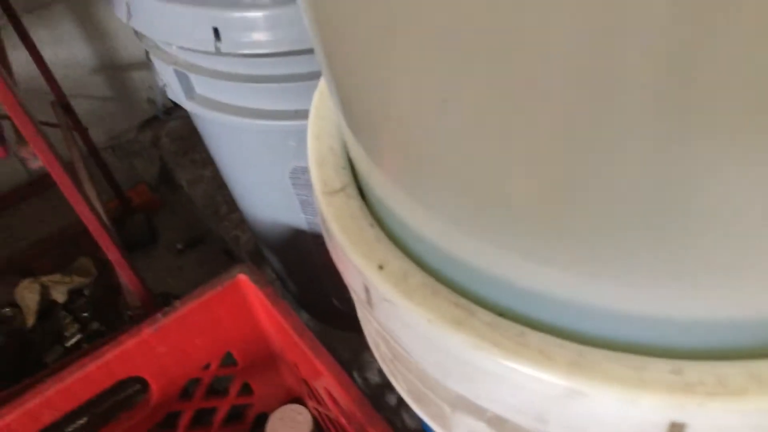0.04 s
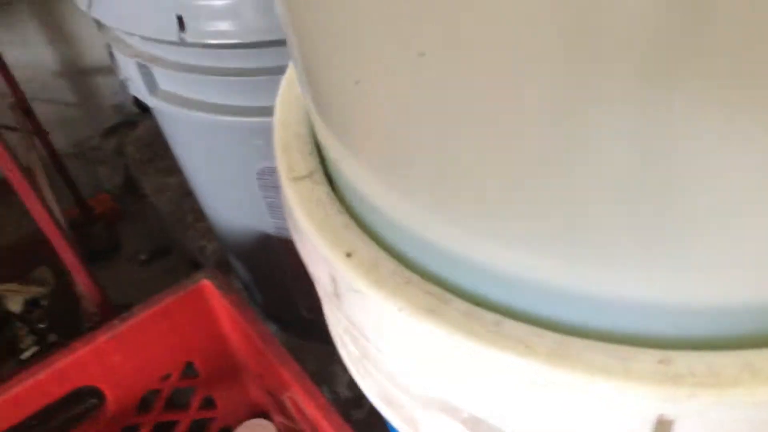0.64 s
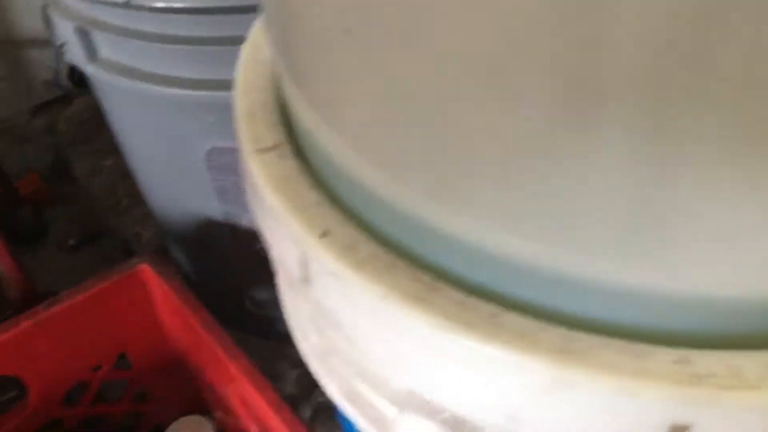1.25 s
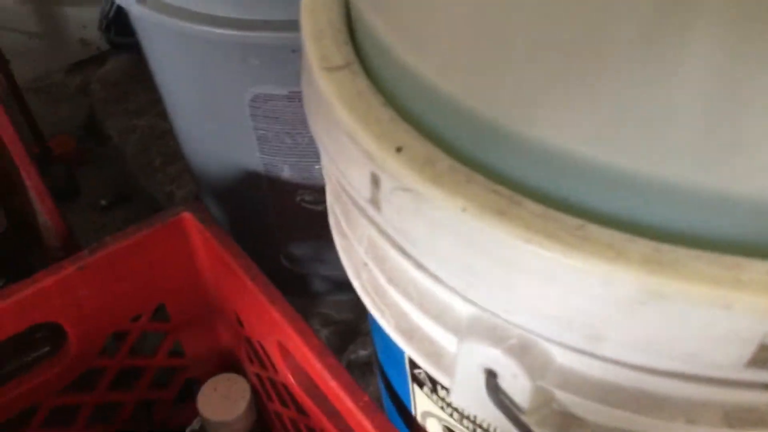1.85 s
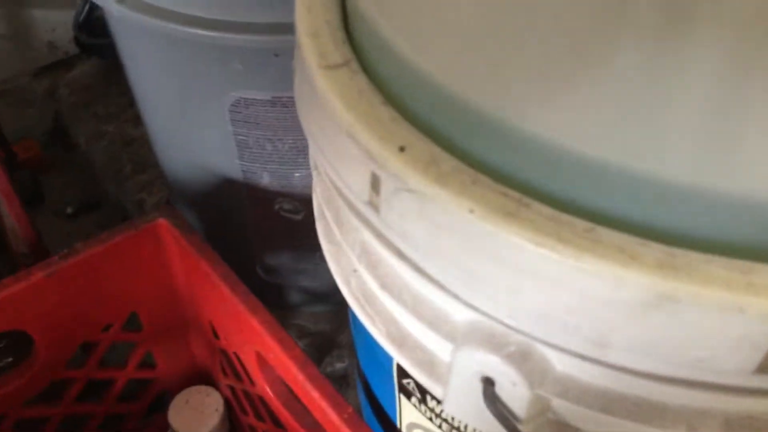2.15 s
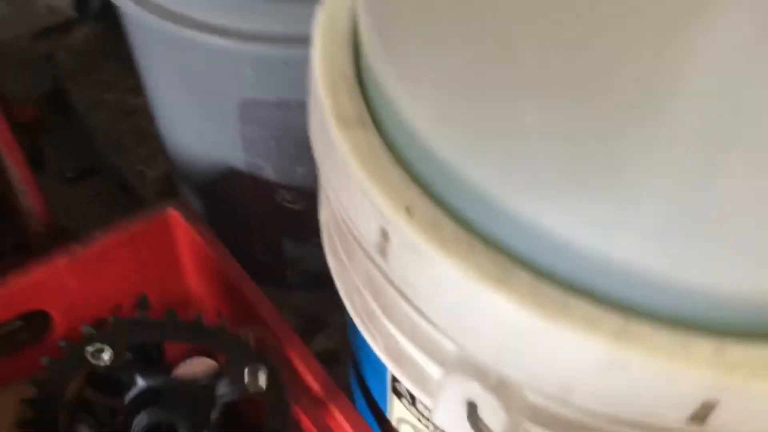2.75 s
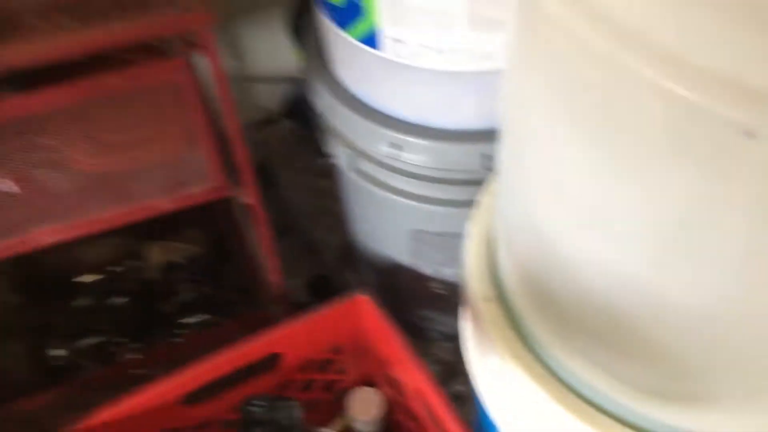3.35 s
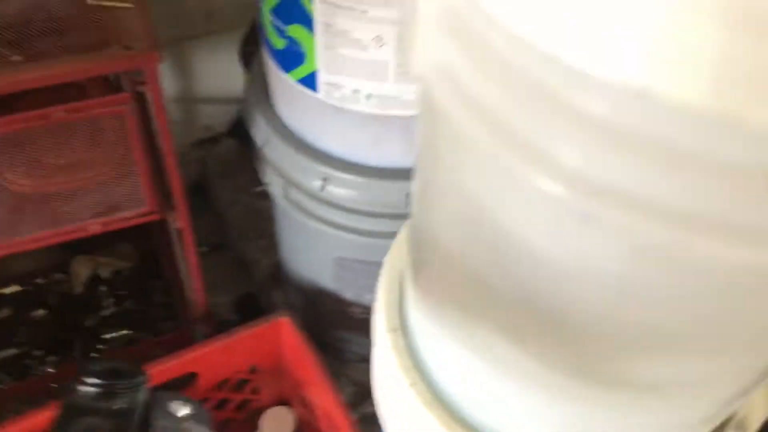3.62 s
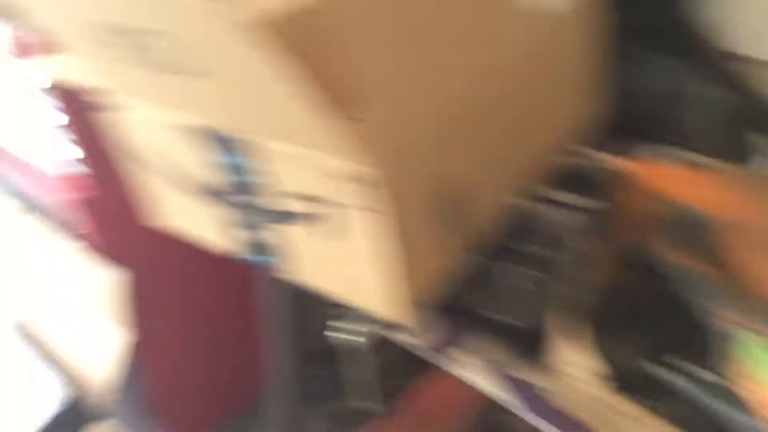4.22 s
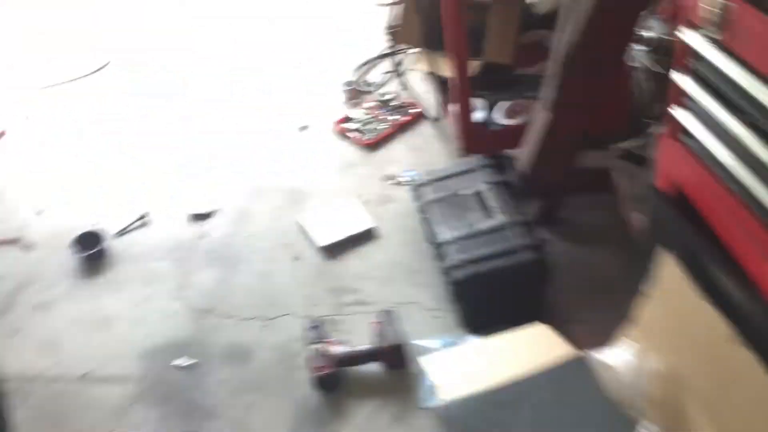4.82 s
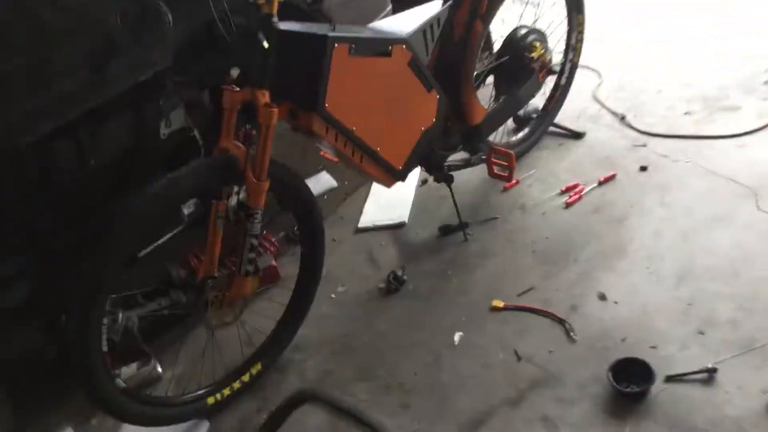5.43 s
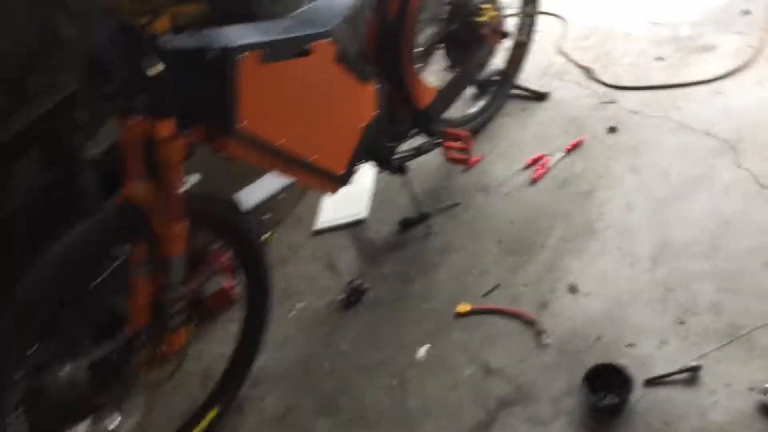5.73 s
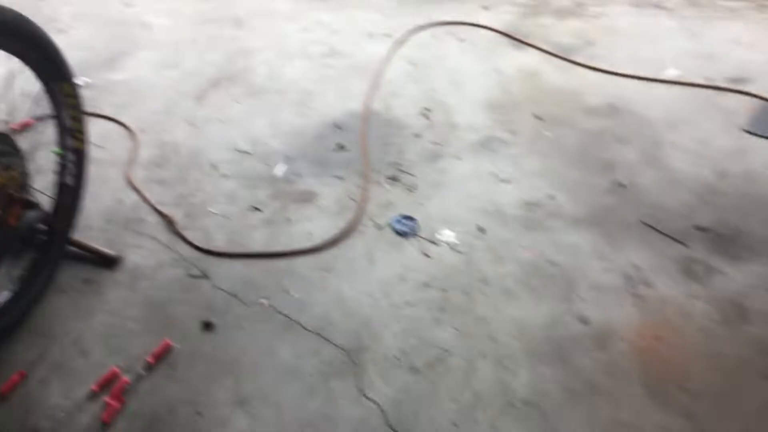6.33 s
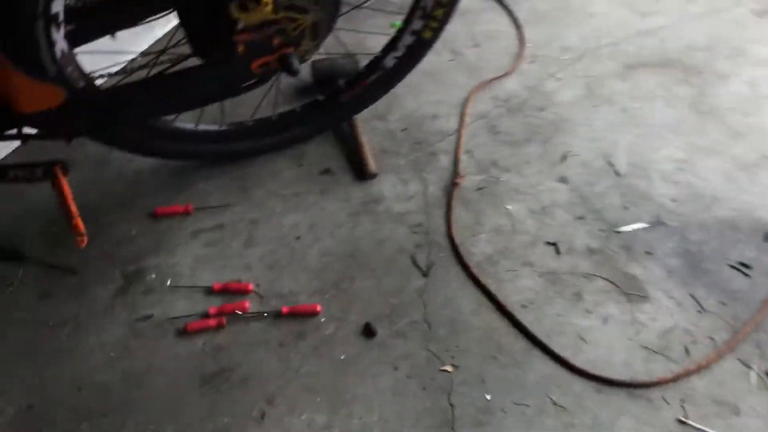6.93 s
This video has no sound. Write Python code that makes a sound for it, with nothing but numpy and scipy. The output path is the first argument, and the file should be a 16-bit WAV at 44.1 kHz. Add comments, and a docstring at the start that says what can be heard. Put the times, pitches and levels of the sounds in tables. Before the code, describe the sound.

A bicycle crankset is worked out of a plastic crate, close by in a garage with a short echo. Light scrapes and small knocks begin at once. From about 1 second the knocks get louder and come in uneven clusters, with a hollow boom from the crate near 1.4 seconds. The metal chainring clinks and rings brightly over the grating, loudest around 1.9, 2.3 and 2.6 seconds. The crankset comes free at about 3 seconds and the scraping dies away. From 4 seconds it is carried across the floor with faint jingles, swishing clothes and a few soft foot thumps. One sharp, ringing metal clank stands out at 5.2 seconds, followed by light ticks and rustles until about 7 seconds. A low traffic rumble runs underneath throughout, and distant engines rise slightly in pitch as they pull away between 3 and 6 seconds.

```python
"""A bicycle crankset (the pedal arms and their toothed chainring) is worked out of a plastic crate.
Parts scrape and knock, the hollow crate booms and the metal chainring clinks, echoing in a garage.
The crankset is then carried across the floor, jingling faintly and giving one sharp clank, while
feet thump and clothes rub with each stride. Outside, distant engines rise in pitch as they pull
away over a low traffic rumble."""
import sys
import numpy as np
from scipy import signal
from scipy.fft import rfft, irfft, next_fast_len
from scipy.io import wavfile
from scipy.ndimage import uniform_filter1d

SR = 44100
rng = np.random.default_rng(int(sys.argv[2]) if len(sys.argv) > 2 else 0)


def log_audio(samples):
    """Write samples as a 16-bit WAV file to the path given in sys.argv[1]."""
    # one column per channel
    frames = np.atleast_2d(samples).T
    # limit to full scale, then quantise
    limited = np.clip(frames, -1, 1)
    pcm = np.round(limited * 32767).astype(np.int16)
    wavfile.write(sys.argv[1], SR, pcm)


N = 311787
T = np.arange(N) / SR
HIT_T = T[:16384]  # time within one hit, in seconds
LIFT_OUT_S = 3.005  # when the crankset leaves the crate
# the chainring's natural tones (modes): pitch_hz, level_db, t60_s (time to fade by 60 dB)
CHAINRING_MODES = [(1141, -34, 0.049), (1254, -14.5, 0.24), (1528, -21, .18), (1914, -12.5, 0.079),
                   (2125, -18.5, 0.11), (2767, -15, 0.17), (3020, -9, 0.23), (3658, -3, 0.48),
                   (3790, -1.5, .26), (4134, -4.5, 0.71), (4565, -9, 0.14), (5500, -13.5, 0.22),
                   (6040, -13, 0.35), (7000, -24, 0.27), (7180, -16.5, 0.19), (7220, -8.5, 0.42),
                   (8090, -6, 0.29), (8990, -10, 0.79), (9290, -23.5, 0.39), (11600, -22, .25),
                   (11800, -19, 0.66), (13730, -26, 0.13)]


def undb(db):
    """Turn decibels into a gain."""
    return 10 ** (np.asarray(db) / 20)


def unit(x):
    """Scale to an average (rms) level of 1."""
    return x / np.sqrt(np.mean(x ** 2) + 1e-20)


def crest(x):
    """The level of the loudest three milliseconds."""
    return np.sqrt(uniform_filter1d(x ** 2, 132).max() + 1e-20)


def fade(t60):
    """A fade that falls 60 dB every t60 seconds."""
    return np.exp(-np.log(1000) * HIT_T / np.maximum(t60, 1e-3))


def curves(table):
    """Join a table's timed points into one curve per value column."""
    times, *columns = np.transpose(table)
    return [np.interp(T, times, column) for column in columns]


def band(x, low_hz, high_hz, order=3):
    """Keep the sound between two frequencies."""
    sos = signal.butter(order, [low_hz, min(high_hz, SR / 2 - 1000)], "band", fs=SR, output="sos")
    return signal.sosfilt(sos, x + 1e-18)


def colour(x, points):
    """Shape a sound's bass and treble by (pitch_hz, level_db) points."""
    hz, db = np.transpose(points)
    size = next_fast_len(len(x))
    bin_hz = np.maximum(np.fft.rfftfreq(size, 1 / SR), 1)
    gain = undb(np.interp(np.log(bin_hz), np.log(hz), db))
    return irfft(rfft(x, size) * gain, size)[:len(x)]


def wander(rate_hz):
    """A slow random drift of about 1 either way."""
    hold = int(SR / rate_hz)
    steps = np.repeat(rng.standard_normal(N // hold + 1), hold)
    return unit(uniform_filter1d(steps, hold)[:N])


def add(out, start_s, sound):
    """Mix a sound in at a given time."""
    i = max(int(start_s * SR), 0)
    out[i:i + len(sound)] += sound[:N - i]


def stroke(start_s, length_s, swell_s, release_t60):
    """The loudness of one rubbing movement: it swells, holds and dies away."""
    swell = np.clip((T - start_s) / swell_s, 0, 1)
    return swell * np.exp(-np.log(1000) * np.clip((T - start_s - length_s) / release_t60, 0, 2))


def friction(per_s, spread_db, t60):
    """Rubbing surfaces make tiny catches of uneven size, each a short burst of noise."""
    catches = (rng.random(N) < per_s / SR) * undb(spread_db * np.minimum(rng.exponential(size=N), 4))
    energy = signal.fftconvolve(catches ** 2, fade(t60) ** 2)[:N]
    return unit(rng.standard_normal(N) * np.sqrt(np.abs(energy)))


def scraping(sing_db=-5, crate_db=-27, crate_follow=0.47):
    """Parts grate, set the chainring singing and drum on the crate until the crankset is lifted."""
    # shoves that drag the parts over each other: start_s, length_s, level_db
    shoves = [(0.032, 0.16, -43.5), (0.372, 0.037, -51), (.48, 0.039, -54.5), (0.647, 0.021, -44),
              (0.709, 0.052, -47), (0.998, .22, -46), (1.217, 0.096, -44), (1.376, 0.037, -43),
              (1.686, 0.087, -43), (1.859, 0.18, -41), (2.092, 0.049, -45.5), (2.204, 0.036, -36),
              (2.336, 0.22, -39), (2.494, .16, -38), (2.714, 0.23, -42), (2.97, 0.034, -62),
              (3.17, 0.11, -48)]
    # light rubbing between shoves: time_s, level_db
    rubbing = [(0, -54.5), (.9, -62.5), (1.6, -55.5), (3.1, -46.5), (3.4, -63), (3.7, -71)]
    # tone of the scrape: pitch_hz, level_db
    scrape_colour = [(700, 11.5), (1300, 4.5), (1800, 4.5), (2600, -3), (4200, -2), (8000, -9),
                     (11000, -10.5), (16000, -17.5)]
    # its treble compared with its middle range: time_s, level_db
    treble = [(.3, -4), (1.1, -7), (2.7, -7), (3.0, -1.5), (3.25, 4), (3.4, 3)]
    # the hollow crate's tones: pitch_hz, width_hz, level_db
    crate_modes = [(196, 30, -3), (313, 66, -0.5), (573.3, 71, -1.5), (684, 59, -2)]
    rubbing_db, treble_db = curves(rubbing) + curves(treble)
    pushes = [undb(db) * stroke(start_s, length_s, swell_s=0.033, release_t60=0.11)
              for start_s, length_s, db in shoves]
    level_db = 20 * np.log10(np.hypot(np.max(pushes, axis=0), undb(rubbing_db)))
    grit = friction(per_s=1100, spread_db=4.5, t60=0.018)
    grate = colour(grit, scrape_colour)
    grate = unit(band(grate, 1200, 5500)) + undb(treble_db) * unit(band(grate, 5500, 17000))
    # scraping teeth feed all the modes about equally
    ring = sum(np.sin(2 * np.pi * hz * HIT_T) * fade(t60) for hz, _, t60 in CHAINRING_MODES)
    grate += undb(sing_db) * unit(signal.fftconvolve(grate, ring)[:N])
    grate *= np.clip((rubbing[-1][0] - T) * 20, 0, 1)  # stops when the rubbing ends
    hollow = unit(sum(undb(db) * band(grit, hz - width / 2, hz + width / 2, order=2)
                      for hz, width, db in crate_modes))
    hollow *= np.clip((LIFT_OUT_S - T) * 10, 0, 1)
    return grate * undb(level_db) + hollow * undb(crate_follow * level_db + crate_db)


def street(gain_db=-1, overtone_db=-22, recede_db_per_s=2, air_db=-63.5):
    """Traffic rumbles and air hisses softly; engines rise in pitch and fade as they drive off."""
    # traffic rumble: time_s, low_band_db, upper_band_db
    rumble = [(0, -45.5, -64), (2.9, -43.5, -58), (3.45, -37, -52.5), (4.0, -45, -53.5), (4.5, -50, -50),
              (7.07, -49.5, -52)]
    # engines pulling away: start_s, end_s, start_pitch_hz, end_pitch_hz, level_db
    engines = [(3.112, 3.942, 112.6, 130.5, -39), (4.2, 4.848, 206, 227, -54),
               (4.695, 6.101, 77.9, 83.4, -47.5)]
    # tone of the still air: pitch_hz, level_db
    air_colour = [(150, -11.5), (290, -2), (450, -9.5), (900, -14.5), (1300, -18), (4200, -21.5),
                  (7000, -30), (13300, -27.5), (16000, -33.5)]
    low_db, upper_db = curves(rumble)
    out = undb(low_db + gain_db) * unit(band(rng.standard_normal(N), 50, 108.3))
    out += undb(upper_db + gain_db) * unit(band(rng.standard_normal(N), 93, 240))
    for start_s, end_s, start_hz, end_hz, db in engines:
        hz = np.interp(T, [start_s, end_s], [start_hz, end_hz]) * (1 + .006 * wander(11))
        phase = 2 * np.pi * np.cumsum(hz) / SR
        hum = unit(np.sin(phase) + undb(overtone_db) * np.sin(2 * phase))
        throttle = np.clip(np.minimum(T - start_s, end_s - T) * 20, 0, 1)
        level_db = db + gain_db - recede_db_per_s * (T - start_s) + 3.4 * wander(11)
        out += throttle * undb(level_db) * hum
    air_gain = undb(air_db + 2.2 * wander(5.4))
    air = band(colour(rng.standard_normal(N), air_colour), 60, 20000, order=2)
    return out + air_gain * unit(air)


def small_part(t60, count=90):
    """A piece of metal or plastic rings briefly with many tones, the high ones dying first."""
    hz = 150 + 15500 * rng.random((count, 1)) ** 1.5
    strength = rng.standard_normal((count, 1))
    mode_t60 = t60 * rng.uniform(0.61, 1.0, (count, 1)) * (3000 / hz) ** 0.39
    modes = strength * np.sin(2 * np.pi * hz * HIT_T) * fade(mode_t60)
    return unit(modes.sum(axis=0)[:2048])


def knocks(onset_db=-21, chatter_db=-6, ring_db=-2, gain_db=-1, lift_s=.18, lifted_boom_db=-26.5):
    """Each knock has a brief soft onset, a main hit and a quick chatter, ringing the struck part."""
    # parts knocking together: start_s, level_db, brightness_db_per_octave, chatter_s
    hits = [(0.067, -28.5, 1, 0.0045), (0.105, -34.5, 5, .003), (.193, -31.5, 3.5, 0.0053),
            (0.228, -32.5, 5, 0.0032), (.279, -39, -2, 0.003), (0.486, -43, -5.5, 0.0069),
            (0.598, -39, 7.5, 0.012), (0.721, -37.5, 3.5, 0.008), (0.865, -45.5, -3.5, 0.0057),
            (1.063, -18, 1, 0.0087), (1.088, -21, -1, .003), (1.114, -17.5, -.5, 0.0084),
            (1.142, -25, -2.5, 0.02), (1.276, -28.5, -1.5, .002), (1.372, -17.5, 0, 0.0037),
            (1.409, -34, -5.5, 0.012), (1.523, -25.5, 1, 0.0028), (1.563, -39, 0, 0.0014),
            (1.601, -24, 0, 0.0093), (1.622, -25.5, -2, .018), (1.892, -27.5, -1, 0.043),
            (1.916, -23.5, 3, 0.018), (1.941, -23, 0, 0.014), (1.98, -32, 1, 0.017),
            (2.118, -24, -1, 0.0025), (2.293, -30, -2, 0.027), (2.323, -22, 1, 0.0066),
            (2.378, -26, 0.5, 0.0026), (2.445, -31.5, -0.5, 0.0068), (2.562, -18, 1.5, 0.0044),
            (2.711, -25, -0.5, 0.015), (2.782, -19.5, -0.5, 0.0065), (2.846, -27.5, 0, 0.0081),
            (2.866, -28.5, 3.5, 0.0086), (2.884, -21.5, 1, .0065), (2.957, -24.5, 0, 0.0033),
            (2.978, -29, 1.5, .009), (3.084, -36.5, -1, 0.0047), (3.108, -30, 3.5, 0.0016),
            (3.169, -29, -1.5, 0.0062), (3.312, -37.5, -2, 0.0076), (5.183, -26, 2, 0.0044)]
    # tone shared by all knocks: low_hz, high_hz, level_db
    bands = [(124, 324, -17), (568, 1094, -9.5), (1284, 2875, -2), (2850, 6000, 0), (6000, 16000, -4.5)]
    out = np.zeros(N)
    lead = SR // 125  # samples of soft onset before the hit
    t = HIT_T[:4096] - lead / SR
    for start_s, db, tilt_db, chatter_s in hits:
        force = np.where(t < 0, undb(onset_db) * np.exp(t / 0.014), np.exp(-np.abs(t) / chatter_s))
        clicks = undb(chatter_db) * rng.standard_normal(len(t)) * (rng.random(len(t)) < .15) * force
        clicks[lead] = 1
        crack = unit((rng.standard_normal(len(HIT_T)) * fade(0.026))[:2048])
        hit = signal.fftconvolve(clicks, crack + undb(ring_db) * small_part(t60=.032))
        # the two lowest bands are the crate's floor, which booms less as the crankset is lifted
        boom_db = lifted_boom_db * np.clip(1 + (start_s - LIFT_OUT_S) / lift_s, 0, 1)
        for k, (low_hz, high_hz, band_db) in enumerate(bands):
            part = band(hit, low_hz, high_hz)
            octaves = np.log2(np.sqrt(low_hz * high_hz) / 4100)
            level_db = db + gain_db + band_db + tilt_db * octaves + boom_db * (k < 2)
            add(out, start_s - lead / SR, undb(level_db) * part / crest(part))
    return out


def clinks(contact_t60=.05, sing_db=-16, tooth_t60=0.36, twin_db=-6, split_hz=35,
           bounce_s=0.01, bounce_db=-12, loose_below_db=-34, clatter_db=-4):
    """The struck chainring rings hard, then sings on; light touches leave it loose, so it jangles."""
    # blows on the chainring: start_s, level_db, tooth_pitch_hz, tooth_boost_db, ring_length_share
    blows = [(.600, -43.5, 7900, -6, .38), (.672, -37, 1283, 10, 0.091), (.935, -51.5, 4180, 2, 0.67),
             (1.134, -24.5, 6780, 7, .45), (1.613, -24, 1594, -8, 0.81), (1.643, -33.5, 7230, 1, 0.59),
             (1.727, -35.5, 7230, 20, 0.9), (1.76, -36.5, 7260, 8, 0.66), (1.895, -22, 7260, 5, 0.61),
             (1.921, -12.5, 3014, -0.5, 0.17), (2.217, -36.5, 8000, -7, .4), (2.297, -29.5, 11750, -16, .8),
             (2.326, -17, 3596, 8, 1), (2.329, -31, 12841, 8, .6), (2.335, -23, 1121, 13, 0.4),
             (2.563, -11.5, 4155, 2.5, .29), (2.621, -26, 4170, 11, 0.78), (2.712, -19, 4143, 6, 0.3),
             (2.867, -21, 2720, 8, 0.15), (2.886, -32, 10200, 10, .7), (3.090, -31, 4630, 4, 0.55),
             (3.138, -25, 3840, 11, .05), (3.794, -55.5, 2973, -2, 0.26), (4.075, -50, 2256, 7, .2),
             (4.236, -58.5, 7280, 12, 0.48), (4.281, -49.5, 2180, 3.5, 1), (4.334, -52.5, 2940, 2, 0.63),
             (4.68, -58, 2250, -2, .3), (5.085, -55, 3700, 11, .3), (5.172, -34, 3800, -12, .3),
             (5.184, -17, 2708, -0.5, .45), (5.1907, -11.5, 3700, -2.5, 0.21),
             (5.480, -46.5, 3675, 3, 0.96), (5.558, -44, 2700, -2.5, 0.16), (6.116, -39.5, 3000, -7, 0.23),
             (6.144, -45, 4560, 4, 0.34), (6.375, -61.5, 4130, 0.5, 0.35)]
    out = np.zeros(N)
    hz, mode_db, t60 = np.transpose(CHAINRING_MODES)[:, :, None]
    # every mode has a close twin, and together they waver
    hz = np.vstack([hz, hz + split_hz * rng.uniform(-1.1, 1, hz.shape)])
    mode_db, t60 = np.vstack([mode_db, mode_db + twin_db]), np.vstack([t60, t60])
    waves = np.exp(2j * np.pi * hz * HIT_T) * (1 - fade(0.0054))
    for start_s, db, tooth_hz, tooth_db, ring_share in blows:
        tilt_db = 6.5 * np.log2(tooth_hz / 4300)  # per octave: a higher contact tone is brighter
        loose = np.clip((loose_below_db - db) / 12, 0, 1)
        # a light touch spreads evenly and spares the strongest modes
        touch_db = mode_db * (1.5 - loose / 2) - 4 * loose * (mode_db > -3)
        gain = undb(touch_db + tilt_db * np.log2(hz / tooth_hz))
        modes = gain * waves * (fade(contact_t60) + undb(sing_db) * fade(t60 * ring_share))
        # the tooth that was touched adds a tone of its own
        tooth = np.exp(2j * np.pi * tooth_hz * HIT_T) * (1 - fade(0.014))
        tooth *= fade(contact_t60) + undb(sing_db) * fade(tooth_t60 * ring_share)
        modes = np.vstack([modes, undb(tooth_db) * tooth])
        gaps_s = bounce_s * (1 + .5 * loose) * rng.uniform(0.29, 1.5, size=3)
        for bounce, delay_s in enumerate([0, *np.cumsum(gaps_s)]):
            phases = np.exp(2j * np.pi * rng.random(len(modes)))
            ring = np.imag(phases @ modes)
            clatter = band(rng.standard_normal(len(HIT_T)), 1300, 4400, order=2) * fade(0.037)
            ring = ring / crest(ring) + loose * undb(clatter_db) * clatter / crest(clatter)
            ring *= 1 - fade(0.024 * loose)  # a light touch swells gently
            level_db = db + bounce * bounce_db * (1 - 0.75 * loose)
            add(out, start_s + delay_s, undb(level_db) * ring / crest(ring))
    return out


def thumps(band_ratio=1.41):
    """The crate and the feet make low booms that die quickly."""
    # dull thumps: start_s, level_db, pitch_hz, t60_s
    booms = [(1.371, -24.5, 176, 0.077), (4.349, -45.5, 136, 0.52), (6.187, -37.5, 161, 0.048),
             (6.748, -46, 420.5, 0.13)]
    out = np.zeros(N)
    for start_s, db, hz, t60 in booms:
        burst = rng.standard_normal(len(HIT_T)) * fade(t60)
        boom = band(burst, hz / band_ratio, hz * band_ratio, order=2)
        add(out, start_s, undb(db) * boom / crest(boom))
    return out


def clothes(rest_db=-76, gain_db=-1):
    """Cloth rubs on cloth with each stride: a grainy rustle under a finer hiss."""
    # swishes of cloth: start_s, swell_s, length_s, level_db, treble_db
    swishes = [(3.967, 0.076, 0.1, -50, -2), (4.479, 0.08, 0.23, -61, -1.5),
               (4.728, 0.053, 0.073, -67.5, 16.5), (4.979, 0.075, 0.13, -55, -7),
               (5.212, 0.038, 0.21, -55.5, 3), (5.764, 0.15, 0.2, -65, 6), (6.038, .012, 0.1, -55, 0.5),
               (6.645, 0.0075, 0.035, -53, 2.5), (6.702, 0.039, 0.085, -55, -2)]
    # tone of the cloth: pitch_hz, level_db
    cloth_colour = [(600, -4), (1500, 1), (2200, -0.5), (3200, -2.5), (5000, -3.5), (9000, -6),
                    (13000, -9.5), (16000, -13.5)]
    rustle_gain = hiss_gain = undb(rest_db) * (T > swishes[0][0])
    for start_s, swell_s, length_s, db, treble_db in swishes:
        stride = undb(db) * stroke(start_s, length_s, swell_s, release_t60=0.29)
        rustle_gain = np.maximum(rustle_gain, stride)
        hiss_gain = np.maximum(hiss_gain, undb(treble_db) * stride)
    coarse = colour(friction(per_s=1300, spread_db=1, t60=.008), cloth_colour)
    fine = colour(friction(per_s=4600, spread_db=1.5, t60=0.0055), cloth_colour)
    rustle = rustle_gain * unit(band(coarse, 960, 3900, order=2))
    hiss = hiss_gain * unit(band(fine, 5600, 16980))
    return (rustle + hiss) * undb(gain_db)


def garage(x, echo_db=-13, low_t60=0.28, high_t60=0.37, treble_db=-3):
    """A cluttered room scatters the sound into a short, smooth echo."""
    noise = rng.standard_normal(len(HIT_T))
    low = band(noise, 81, 3900) * fade(low_t60)
    high = undb(treble_db) * band(noise, 3500, 11000) * fade(high_t60)
    tail = (low + high) * (1 - fade(0.023))
    return x + undb(echo_db) * signal.fftconvolve(x, tail / np.linalg.norm(tail))[:N]


def scene():
    """The parts and thumps echo in the garage; clothes and street join them in one channel."""
    handling = knocks() + clinks() + thumps() + scraping()
    return (garage(handling) + clothes() + street())[None]


def record(dry, top_hz=16100):
    """Cut off the very highest treble."""
    return signal.sosfilt(signal.ellip(10, .2, 70, top_hz, fs=SR, output="sos"), dry)


dry = scene()
out = record(dry)
log_audio(out)
```